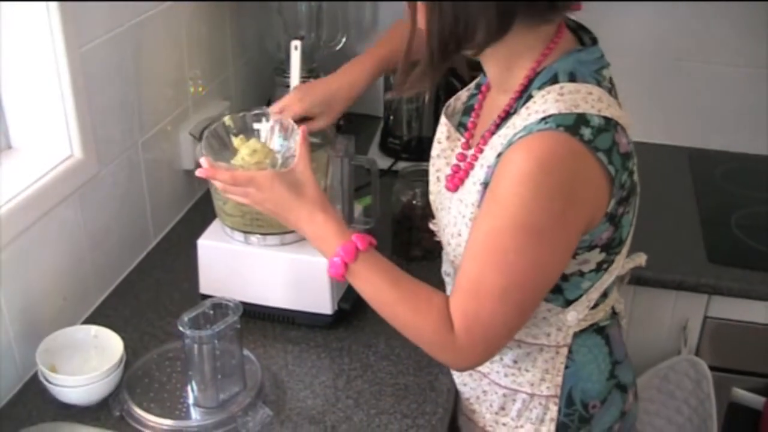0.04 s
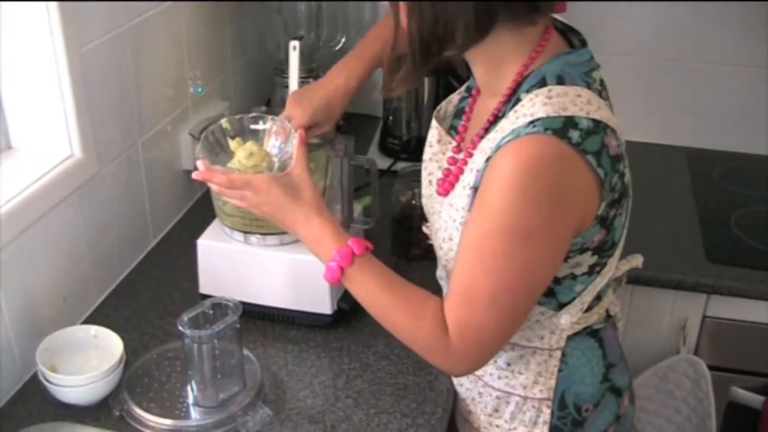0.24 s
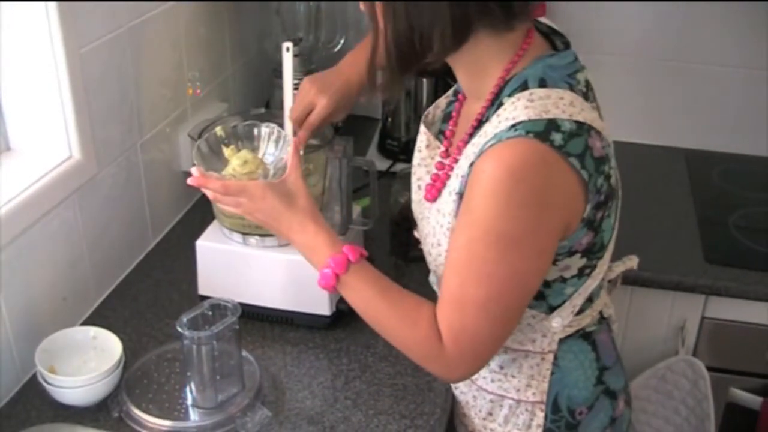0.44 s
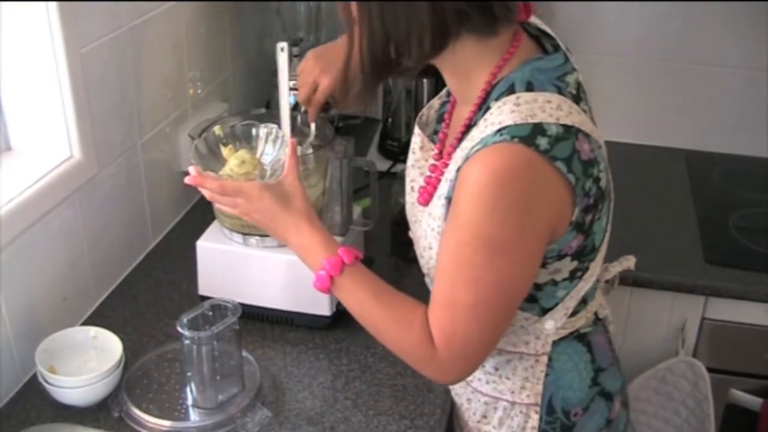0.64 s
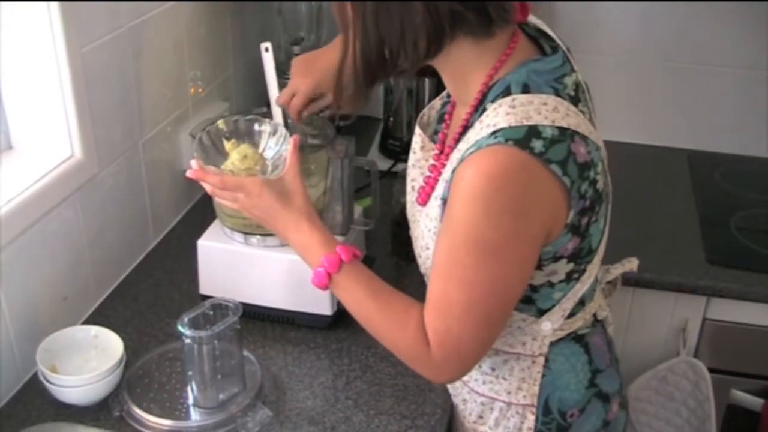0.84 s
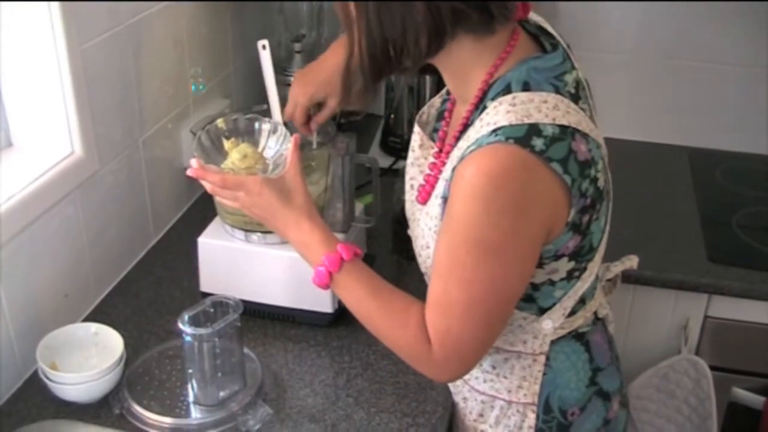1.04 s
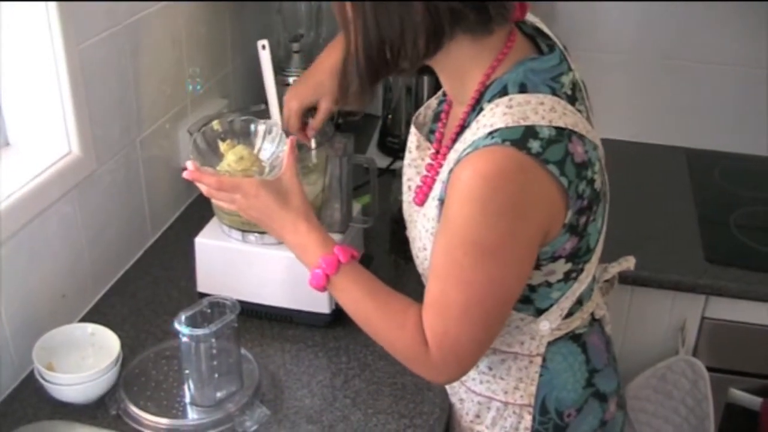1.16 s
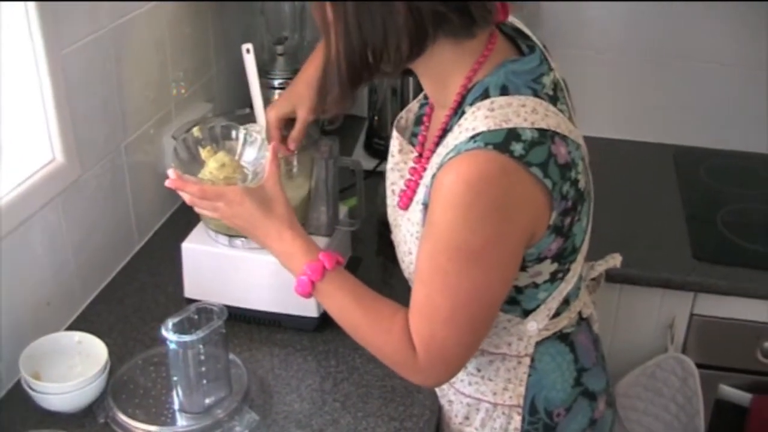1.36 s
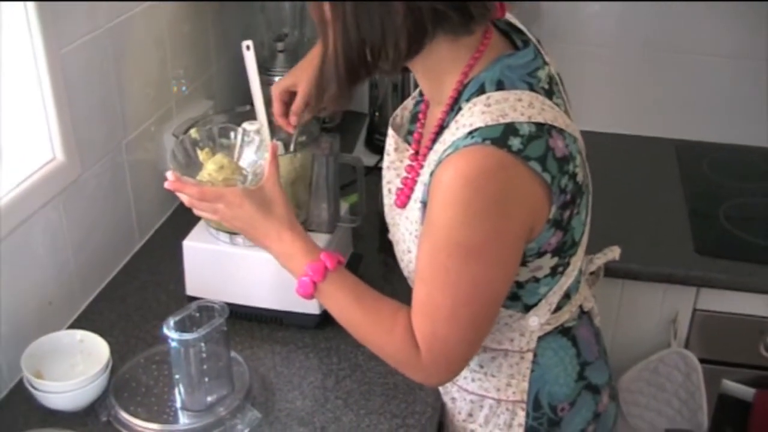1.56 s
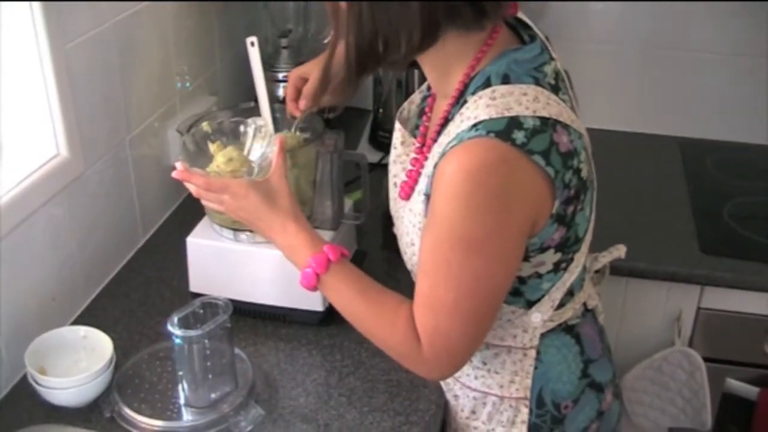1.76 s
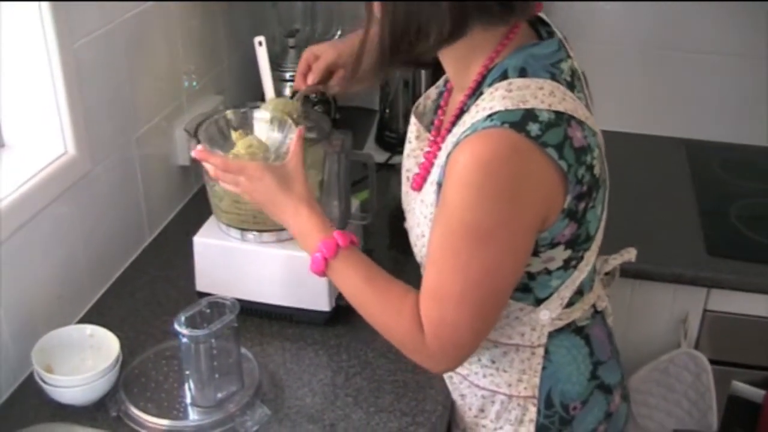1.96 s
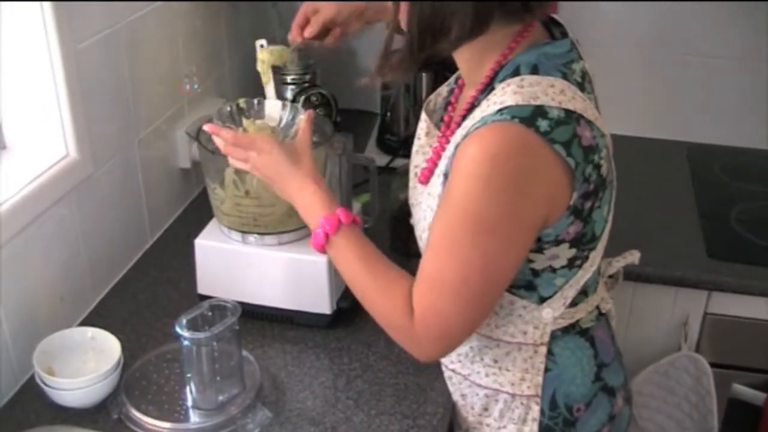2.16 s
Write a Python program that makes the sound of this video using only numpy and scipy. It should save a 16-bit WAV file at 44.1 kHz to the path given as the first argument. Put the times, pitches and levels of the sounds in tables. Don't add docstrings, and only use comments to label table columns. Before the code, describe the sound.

A spoon knocks and scrapes inside a plastic food processor bowl in a hard, tiled kitchen

```python
import sys
import numpy as np
from scipy import signal
from scipy.fft import rfft, irfft
from scipy.io import wavfile
from scipy.ndimage import uniform_filter1d

SR = 44100
rng = np.random.default_rng(int(sys.argv[2]) if len(sys.argv) > 2 else 0)


def to_wav(s):
    ch = np.atleast_2d(s).T
    pcm = np.round(np.clip(ch, -1, 1) * 32767)
    wavfile.write(sys.argv[1], SR, pcm.astype(np.int16))


def linear_from_db(decibels):
    return 10 ** (np.asarray(decibels, float) / 20)


N = 97505


def rms_one(x):
    return x / np.sqrt(np.mean(x ** 2) + 1e-20)


def at_hz(points, hz):
    table_hz, value = np.array(points).T
    return np.interp(np.log(hz + 1), np.log(table_hz), value)


def coloured(x, points):
    hz = np.fft.rfftfreq(x.shape[-1], 1 / SR)
    return irfft(rfft(x) * linear_from_db(at_hz(points, hz)), x.shape[-1])


def bandpass(x, low_hz, high_hz, order=2):
    return signal.sosfilt(signal.butter(order, [low_hz, high_hz], "band", fs=SR, output="sos"), x)


def stereo(mid, side):
    return np.array([mid + side, mid - side])


def drift(hz):
    r = np.exp(-2 * np.pi * hz / SR)
    wander = signal.lfilter([1], [1, -2 * r, r * r], rng.standard_normal(N + 4000))
    return rms_one(wander[4000:])


def ring(force, hz, t60):
    r, w = linear_from_db(-60 / (t60 * SR)), 2 * np.pi * hz / SR
    return signal.lfilter([0, np.sin(w)], [1, -2 * r * np.cos(w), r * r], force + 1e-18)


def bursts(times_s, gains, shapes, decay_s):
    length = shapes.shape[1]
    out, t = np.zeros(N + length), np.arange(length) / SR
    for s, gain, shape in zip(times_s, gains, shapes):
        burst = shape * np.exp(-t / decay_s)
        out[int(max(s, 0) * SR):][:length] += gain * burst / np.sqrt(np.sum(burst ** 2))
    return out[:N]


# (frequency [Hz], level [dB])
RUMBLE_SPECTRUM = [(8.8, -47), (15, -15.5), (86, 0.5), (154, -5.5), (241, -3.5), (333, -7), (684, -10.5),
                   (758, -14), (900, -29), (1170, -49), (1980, -120)]
# (frequency [Hz], level [dB])
HISS_SPECTRUM = [(530, -34), (900, -8), (1320, -5.5), (1550, -6.5), (2300, -5.5), (2830, -7), (3910, -6),
                 (13700, -23.5), (16000, -6)]
# (frequency [Hz], side minus mid [dB])
FLOOR_SIDE = [(60, 1), (240, 6.5), (950, 6), (3770, -2.5), (15000, 1.5)]
RUMBLE_DB, HISS_DB = -58, -53
HUM_HZ, HUM_WIDTH_HZ, HUM_DB = 785, 45, -64


def floor():
    hum = ring(rng.standard_normal(N), HUM_HZ, 2.0 / HUM_WIDTH_HZ)
    out = rms_one(hum) * linear_from_db(HUM_DB)
    for spectrum, db in (RUMBLE_SPECTRUM, RUMBLE_DB), (HISS_SPECTRUM, HISS_DB):
        mid, side = coloured(rng.standard_normal((2, N)), spectrum)
        out = out + linear_from_db(db) * stereo(mid, coloured(side, FLOOR_SIDE)) / np.std(mid)
    return out


# (frequency [Hz], t60 [s])
KITCHEN_T60 = [(250, 0.61), (1000, 0.44), (3000, 0.46), (10000, 0.23)]
# (frequency [Hz], side minus mid [dB])
KITCHEN_SIDE = [(100, 2), (400, -26), (1500, -7), (8000, -2), (13000, 2.5)]
KITCHEN_DB, FIRST_ECHO_S = -3, 0.0034
EARLY_DB, EARLY_S = 20, 0.0059


def kitchen(x):
    t, tail = np.arange(SR // 2) / SR, 0
    edges_hz = 100 * 2 ** np.arange(0, 7.6, .5)
    white = rng.standard_normal((2, 2, len(t)))
    for k, (low, high) in enumerate(zip(edges_hz, edges_hz[1:])):
        mid, side = bandpass(white[k % 2], low, high)
        hz = np.sqrt(low * high)
        t60 = at_hz(KITCHEN_T60, hz)
        band = stereo(mid, linear_from_db(at_hz(KITCHEN_SIDE, hz)) * side)
        tail = tail + band * linear_from_db(-60 * t / t60) * np.sqrt(14 / t60 / SR)
    arrival = np.clip(t / FIRST_ECHO_S - 1, 0, 1)
    early = linear_from_db(EARLY_DB * np.exp(-t / EARLY_S))
    return linear_from_db(KITCHEN_DB) * signal.fftconvolve(x[None], tail * arrival * early, axes=1)[:, :N]


# (start [s], peak [s], end [s], low edge [Hz], high edge [Hz], level [dB])
LIFT = (1.9, 2.01, 2.16, 3000, 5200, -63)


def lift():
    start, peak, end, low_hz, high_hz, db = LIFT
    rustle = rms_one(bandpass(rng.standard_normal(N), low_hz, high_hz))
    return linear_from_db(db + drift(40)) * rustle * np.interp(np.arange(N) / SR, [start, peak, end], [0, 1, 0])


# (time [s], length [s], lowest frequency [Hz], level [dB])
PEELS = [
    (1.555, .008, 11000, -55),
    (1.633, .004, 5000, -51),
    (1.641, .02, 5500, -55),
    (1.787, .005, 7000, -52),
]


def peels():
    out, t = np.zeros(N), np.arange(N) / SR
    for s, length, hz, db in PEELS:
        tear = rms_one(bandpass(rng.standard_normal(N), hz, min(2 * hz, SR / 3)))
        out += linear_from_db(db) * tear * np.interp(t, [s, s + .001, s + length], [0, 1, .3], right=0)
    return out


# (time [s], level [dB])
TICKS = [
    (1.2913, -44),
    (1.7164, -25.5),
]
# (frequency [Hz], level [dB], t60 [s])
DISH = [(1845, -2, .022), (3090, 0, .014), (1500, -9, .008), (2400, -14, .008), (3600, -10, .006),
        (5800, -16, .005)]


def ticks():
    clicks = np.zeros(N)
    for s, db in TICKS:
        clicks[int(s * SR)] = linear_from_db(db - 6)
    clicks = bandpass(clicks, 1200, 6500)
    return sum(linear_from_db(db) * ring(clicks, hz, t60) * (-1) ** k for k, (hz, db, t60) in enumerate(DISH))


DRAG_STARTS_S = (.158, .252, .345, .652, .805, 1.234, 1.264, 1.338)
# (hold [s], fall [s], push into the bowl [dB], hiss [dB])
DRAGS = [
    (0.055, 0.022, -40.5, -45.5),
    (0.057, 0.027, -73, -39),
    (0.044, 0.045, -43, -39.5),
    (0.035, 0.095, -42.5, -67),
    (0.072, 0.15, -53, -61),
    (0.017, 0.0093, -45, -60),
    (0.0077, 0.047, -41.5, -47),
    (0.017, 0.049, -40.5, -45.5),
]
# (frequency [Hz], level per Hz [dB])
DRAG_SPECTRUM = [(500, -1.5), (1500, -18), (4000, -13.5), (7000, 1), (11000, -9.5), (15000, -3.5)]
GRAINS_PER_S, GRAIN_SPREAD_DB, RISE_S = 5000, 2.5, 0.0047


def friction():
    t, strokes = np.arange(N) / SR, []
    for s, (hold, fall, _, _) in zip(DRAG_STARTS_S, DRAGS):
        corners_s = np.cumsum([s, RISE_S, hold, fall])
        strokes.append(np.interp(t, corners_s, [0, 1, 1, 0]) ** 2)
    push, hiss = linear_from_db(np.array(DRAGS)[:, 2:]).T @ np.array(strokes)
    heights = linear_from_db(GRAIN_SPREAD_DB * rng.exponential(1, N)) * rng.choice([-1, 1], N)
    grains = heights * (rng.random(N) < GRAINS_PER_S / SR)
    return push * rms_one(grains), hiss * rms_one(coloured(grains, DRAG_SPECTRUM))


# (time [s], frequency [Hz], level [dB], t60 [s])
PANELS = [(0.0005, 2453, -24.5, 0.1), (0.0005, 880, -25, 0.057), (0.0005, 5600, -24.5, 0.056),
          (0.001, 4530, -43, 0.27), (0.159, 1160, -32, 0.039), (0.176, 1250, -22.5, 0.065),
          (0.178, 2460, -25.5, 0.044), (0.202, 1089, -21.5, 0.073), (0.204, 1810, -37, .1),
          (0.4, 3900, -32.5, 0.12), (0.406, 285.6, -20.5, 0.098), (0.42, 1080, -38, .15),
          (0.651, 2276, -23.5, 0.097), (0.6545, 2350, -20.5, 0.033), (0.6655, 2423, -34, .1),
          (0.653, 1500, -35.5, 0.24), (0.655, 286, -33, 0.61), (0.697, 2200, -22.5, 0.029),
          (0.776, 1797, -30, .1), (0.777, 4710, -28.5, 0.027), (0.801, 847, -17.5, 0.045),
          (0.801, 3040, -25, 0.024), (0.801, 3550, -25, 0.035), (0.816, 552, -27, 0.11),
          (0.966, 2183, -21.5, 0.077), (0.967, 1190, -22.5, .04), (0.966, 3280, -24, 0.038),
          (0.967, 4670, -39, 0.03), (1.021, 1134, -22, 0.037), (1.026, 277, -31.5, 0.42),
          (1.08, 4290, -55.5, 0.36), (1.12, 3710, -53.5, 0.57), (1.25, 244.2, -29, .15),
          (1.336, 838, -32.5, 0.073), (1.345, 6530, -47, 0.11)]
PANEL_RISE_S, FLUTTER_DB, FLUTTER_RAD = 0.00052, 4, .9


def panels():
    out, t = np.zeros(N), np.arange(N) / SR
    flutter = [drift(70) for _ in range(6)]
    for k, (s, hz, db, t60) in enumerate(PANELS):
        age = np.clip(t - s, 0, None)
        shake = min(hz / 2000, 1.5) * np.clip(age / .03, .2, 1)
        swell = 1 - np.exp(-age / (PANEL_RISE_S + 1 / hz))
        level = linear_from_db(db - 60 * age / t60 + FLUTTER_DB * shake * flutter[k % 3]) * swell
        out += level * np.sin(2 * np.pi * hz * age + FLUTTER_RAD * shake * flutter[3 + k % 3])
    return out


# (time [s], ridge rate [Hz], level [dB])
ZIP_FAST = [
    (0.254, 1750, -38),
    (0.264, 2145, -37.5),
    (0.3, 3820, -41),
    (0.326, 4315, -38.5),
    (0.346, 3757, -42.5),
    (0.36, 2710, -38.5),
    (0.376, 1623, -41),
    (0.386, 1012, -45),
    (0.405, 600, -39),
]
ZIP_SLOW = [
    (1.274, 1849, -45),
    (1.286, 2270, -51),
    (1.3, 2306, -51),
    (1.325, 2050, -49),
    (1.345, 1698, -47.5),
]
FAST_OVERTONES_DB = (2, -1.5, 2, 8)
SLOW_OVERTONES_DB = (7, -2.5, -9, -15, -7.5)
WAVER, PATCHY_DB = .021, 3.5
SPEED_BRIGHTENS_DB = 7.5


def zip_over_ridges(rows, overtones_db):
    t, (s, hz, db) = np.arange(N) / SR, np.transpose(rows)
    speed_hz = np.interp(t, s, hz)
    waver = 1 + WAVER * drift(500) * np.sqrt(hz.max() / speed_hz)
    phase = 2 * np.pi * np.cumsum(uniform_filter1d(speed_hz, size=400) * waver) / SR
    gate = uniform_filter1d(1. * (t > s[0]) * (t < s[-1]), size=300)
    dull_db = SPEED_BRIGHTENS_DB * np.log2(speed_hz / hz.max())
    stack = 0
    for k, overtone_db in enumerate(overtones_db):
        level = linear_from_db(overtone_db + k * dull_db + PATCHY_DB * drift(150))
        stack = stack + level * np.sin((k + 1) * phase)
    return np.sqrt(2) * gate * linear_from_db(np.interp(t, s, db)) * stack


CONTACT_S, SPREAD_DB = 0.0047, 2
DRAG_BODY_DB = -26


def struck(modes, rows, colour_hz, level_db, rub):
    s, db, below, above = np.transpose(rows)[:4]
    chatter, scatter = rng.standard_normal((len(s), 1500)), rng.standard_normal((len(s), 30))
    out = 0
    for k, (hz, mode_db, t60) in enumerate(modes):
        colour = np.array([np.interp(np.log(hz), np.log(colour_hz), [a, 0, b])
                           for a, b in zip(below, above)])
        gains = linear_from_db(db + colour + level_db + SPREAD_DB * scatter[:, k])
        force = bursts(s, gains, chatter[:, 9 * k:][:, :1200], CONTACT_S)
        out = out + linear_from_db(mode_db) * ring(force + linear_from_db(DRAG_BODY_DB) * rub, hz, t60) * (-1) ** k
    return out


# (frequency [Hz], level [dB], t60 [s])
BASE = [(257, -4.5, 0.058), (297, -7.5, 0.088), (335.4, -7.5, 0.075)]
# (frequency [Hz], level [dB])
BOWL = [(375, -6.5), (425, -3), (501, -1.5), (555, -1.5), (600, -3), (675, -5.5), (775, -11.5), (880, -3.5),
        (1000, -28.5), (1090, -2.5), (1170, -14.5), (1215, -10), (1310, -9.5)]
# (frequency [Hz], level [dB])
BLADE = [(1488, -5.5), (1580, -2.5), (1850, -4), (2245, -9), (2400, -5), (2620, -3.5), (3035, -3),
         (3200, -6.5), (3550, -9), (3930, -12.5), (4400, -16), (4750, -22), (5200, -15.5), (5750, -17)]
# (time [s], strength near 560 Hz [dB], boom near 280 Hz [dB],
# clang near 1100 Hz [dB])
THUDS = [(0.0, -15, -9.5, -4), (0.019, -23.5, 5, 3), (0.05, -30.5, 7.5, 1), (0.158, -20, -8, 4),
         (0.176, -22, 4, -21), (0.203, -48, 11, -28), (0.404, -20.5, 8, -7), (0.41, -24.5, -18, 4),
         (0.647, -20, 1.5, -5), (0.665, -28, 3, -3.5), (0.694, -24, 5, -27), (0.773, -26.5, -4, -4),
         (0.8, -8, -11, 0), (0.815, -11.5, -1, -13), (0.858, -22, -2.5, -28), (0.966, -21, -2.5, 9),
         (0.978, -21.5, -6, 7), (1.021, -20, 11.5, 0.5), (1.031, -26.5, 9, -21), (1.085, -35, 3, -19),
         (1.236, -29.5, 6, 3.5), (1.25, -27.5, 4, -0.5), (1.266, -35, -17, 0)]
# (time [s], strength near 2300 Hz [dB], near 1600 Hz [dB],
# near 3800 Hz [dB], crack [dB])
CLACKS = [(0.0004, -22, -6, 12, 11.5), (0.158, -20.5, -5, -3.0, 8), (0.1753, -20.5, -8.5, -3, -16),
          (0.2029, -24, -5, -1, 7.5), (0.2107, -29, -6, 8, 5), (0.3984, -35, -15, 23, 7),
          (0.4023, -26.5, 1.5, 11, 8), (0.6472, -27.5, 2, 9, -12), (0.65, -14, -4, 2, -1.5),
          (0.6648, -21, -2, -14, -24), (0.6985, -38, -6, -18, -17), (0.7747, -13.5, 0, -9, 0),
          (0.8, -13, -1, 6, 2), (0.859, -39, -15, -8, 14.5), (0.9652, -9.5, -5, -5.5, -14),
          (0.9776, -32.5, 4, -3, -18), (1.0194, -25.5, 5.5, 10.5, -5.5), (1.2361, -35.5, -12, -15, -1),
          (1.2672, -33.5, 6, -19, 5.5)]
THUD_HZ = (280, 560, 1100)
CLACK_HZ = (1600, 2300, 3800)
BOWL_T60_S, BLADE_T60_S = 0.044, 0.015
THUD_DB, CLACK_DB, BLADE_RUB_DB = -8.5, -7, 6.5
CRACK_LOW_HZ, CRACK_HIGH_HZ, CRACK_S = 1650, 7700, 0.0046
THIN_HZ = 205


def knocks_and_rub(rub):
    wall = [(hz, db, BOWL_T60_S) for hz, db in BOWL]
    blade = [(hz, db, BLADE_T60_S) for hz, db in BLADE]
    thuds = struck(BASE + wall, THUDS, THUD_HZ, THUD_DB, rub)
    clacks = struck(blade, CLACKS, CLACK_HZ, CLACK_DB, linear_from_db(BLADE_RUB_DB) * rub)
    s, db, _, _, crack = np.transpose(CLACKS)
    snap = bursts(s, linear_from_db(db + crack + 10), rng.standard_normal((len(s), 1200)), CRACK_S)
    out = thuds + clacks + bandpass(snap, CRACK_LOW_HZ, CRACK_HIGH_HZ, order=1)
    return signal.sosfilt(signal.butter(4, THIN_HZ, "high", fs=SR, output="sos"), out)


PAN_DB = 3
ZIP_WET_DB, TICK_WET_DB, PANEL_WET_DB = -1, -6, -6


def scene():
    rub, hiss = friction()
    zips = zip_over_ridges(ZIP_FAST, FAST_OVERTONES_DB) + zip_over_ridges(ZIP_SLOW, SLOW_OVERTONES_DB)
    near = knocks_and_rub(rub) + hiss
    taps = ticks() + peels()
    rings = panels()
    to_room = near + linear_from_db(ZIP_WET_DB) * zips + linear_from_db(TICK_WET_DB) * taps + linear_from_db(PANEL_WET_DB) * rings
    wet = kitchen(to_room)
    pan = linear_from_db(np.array([[PAN_DB], [-PAN_DB]]) / 2)
    return (near + zips + taps + rings + lift()) * pan + wet + floor()


def roll_off(x):
    return signal.sosfilt(signal.butter(12, 16470, fs=SR, output="sos"), x)


CUT_HZ, TOP_HZ = 15600, 12540


def record(dry):
    cut = signal.sosfilt(signal.cheby2(10, 50, CUT_HZ + 900, fs=SR, output="sos"), dry)
    mix = signal.sosfilt(signal.butter(4, TOP_HZ, fs=SR, output="sos"), cut)
    return roll_off(mix)


dry = scene()
out = record(dry)
to_wav(out)
```